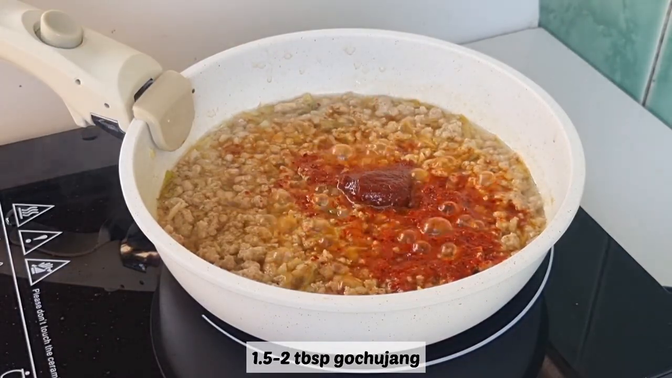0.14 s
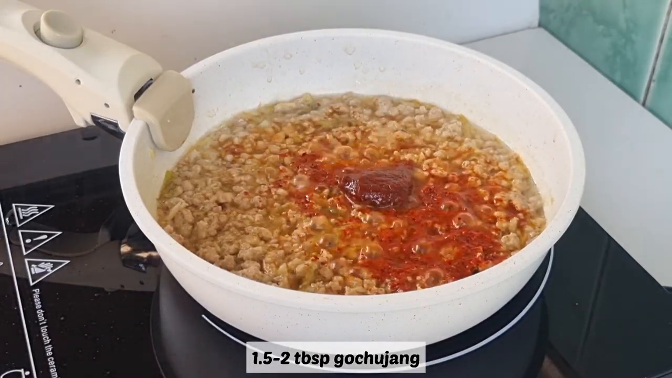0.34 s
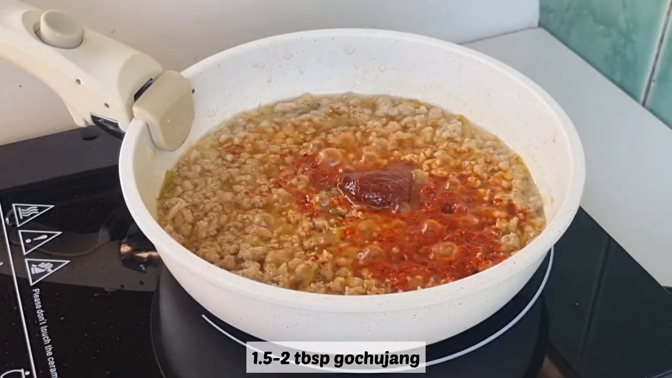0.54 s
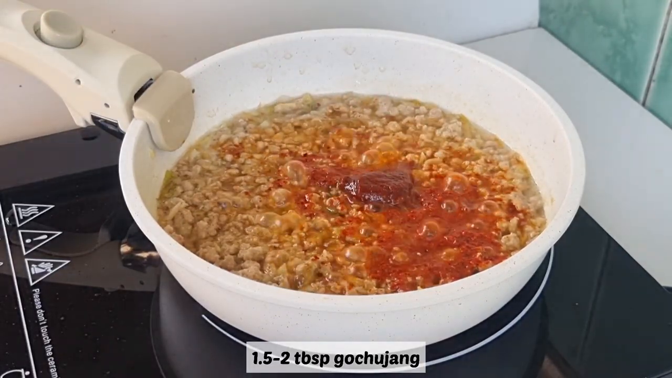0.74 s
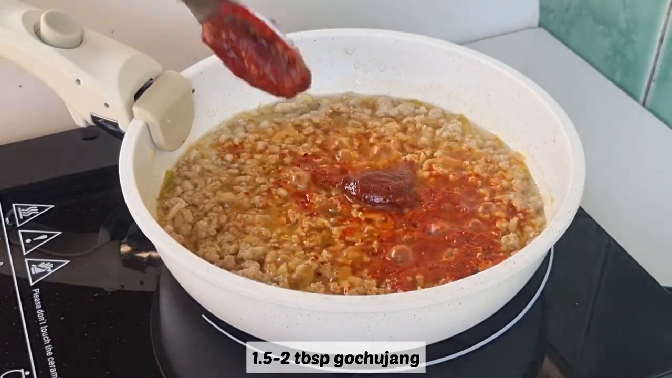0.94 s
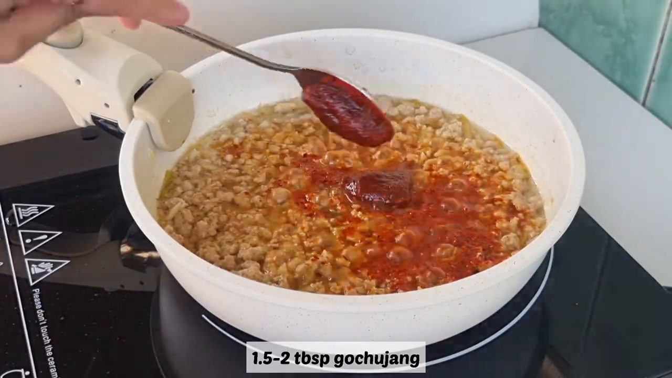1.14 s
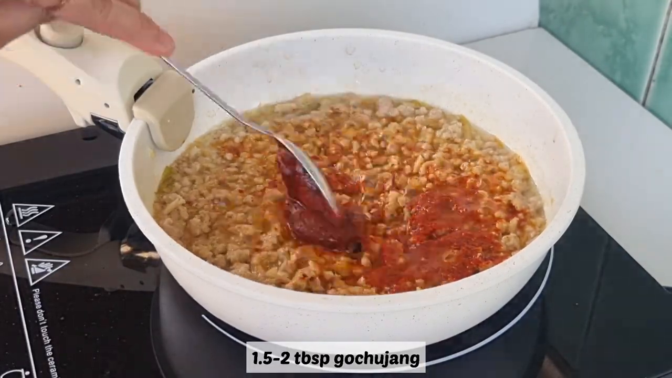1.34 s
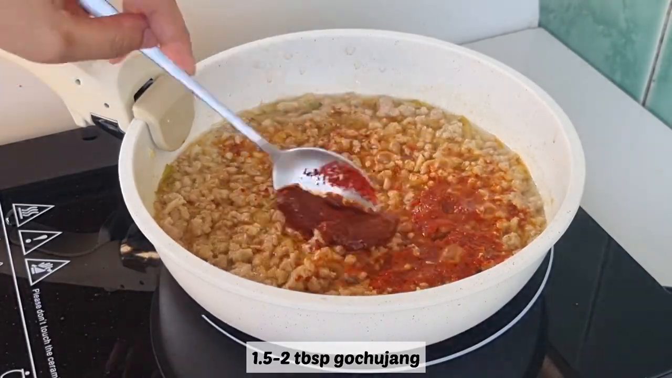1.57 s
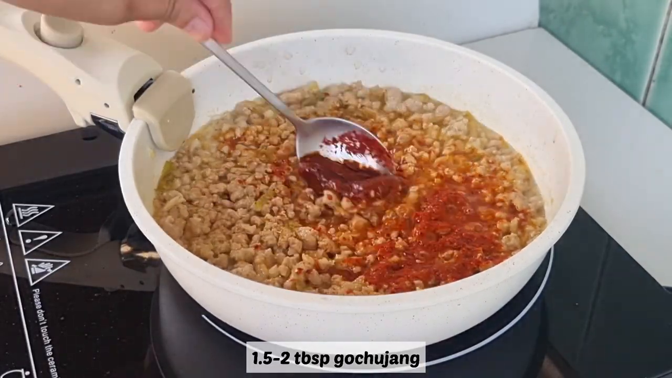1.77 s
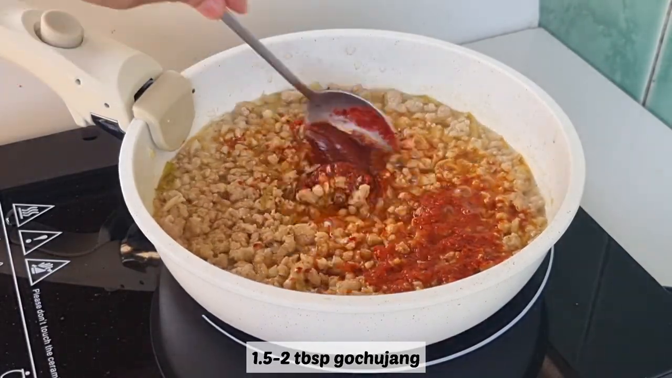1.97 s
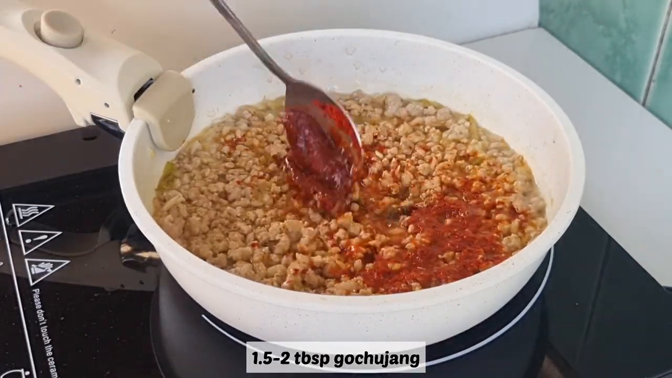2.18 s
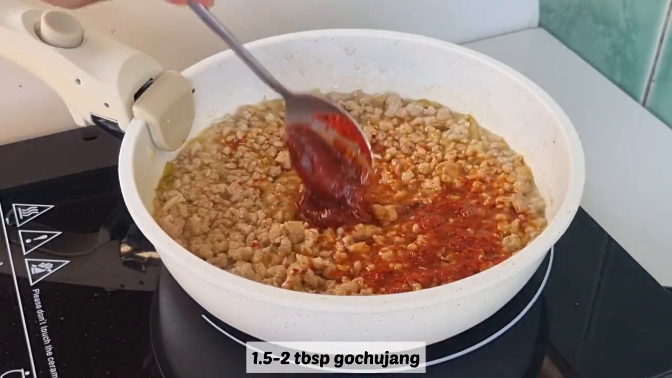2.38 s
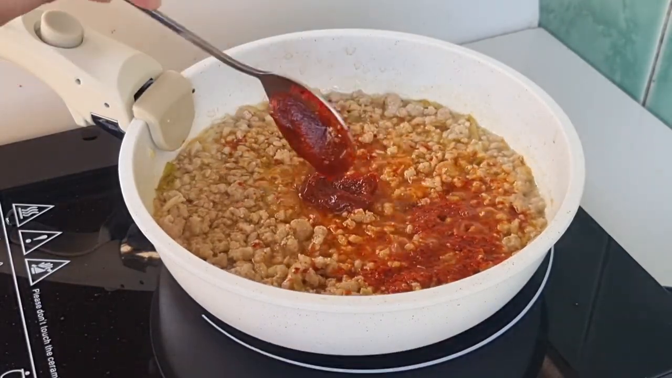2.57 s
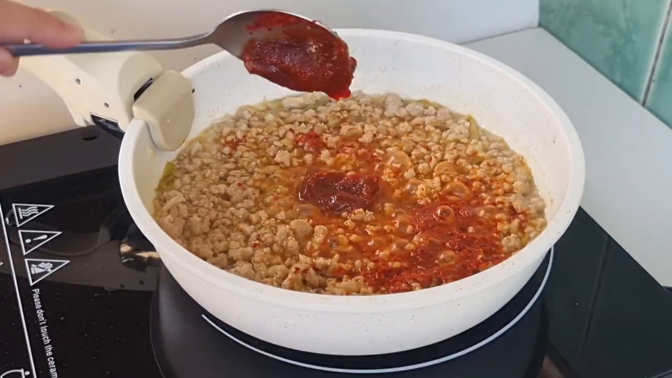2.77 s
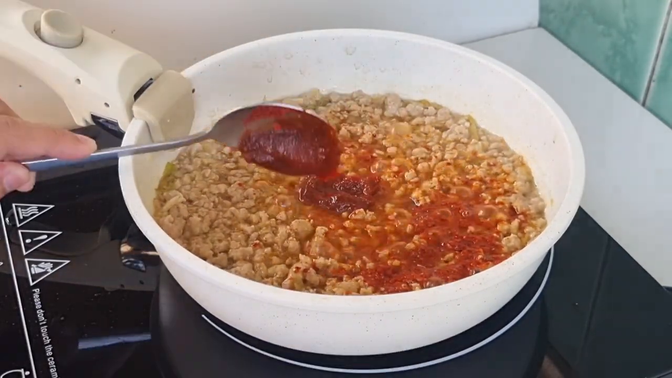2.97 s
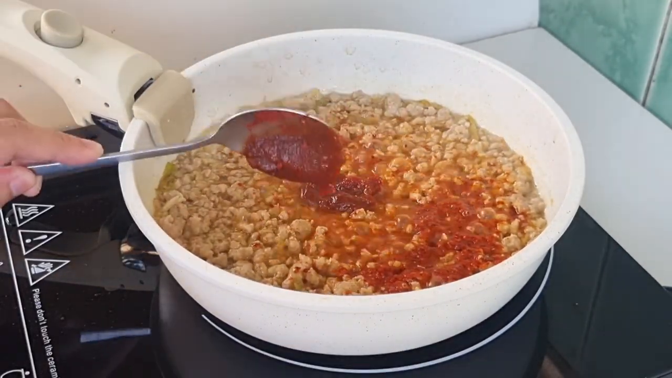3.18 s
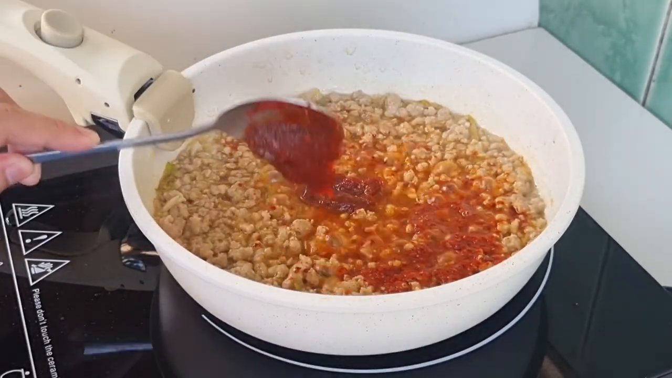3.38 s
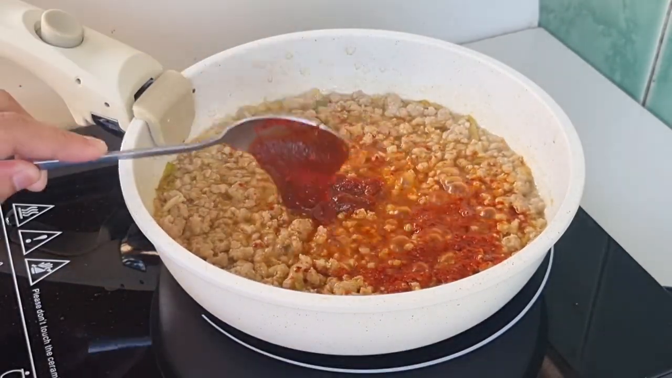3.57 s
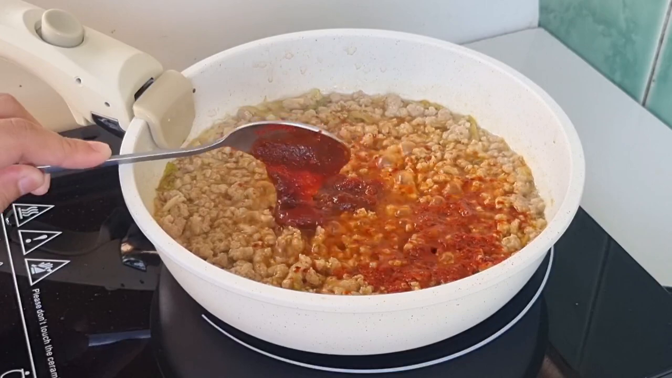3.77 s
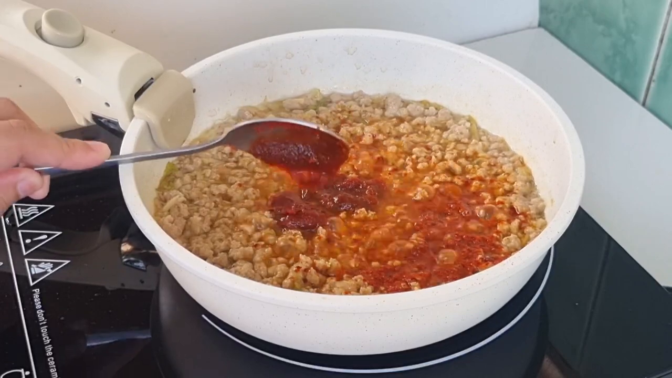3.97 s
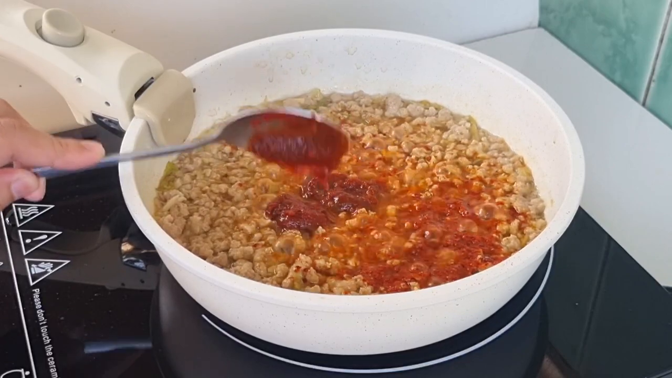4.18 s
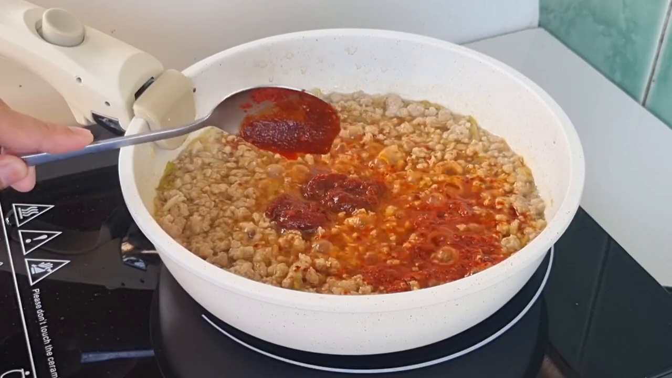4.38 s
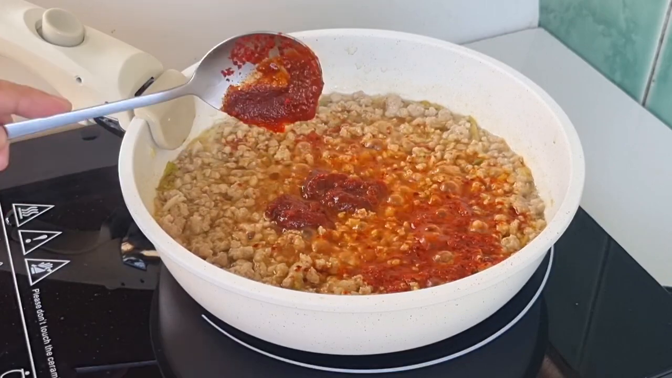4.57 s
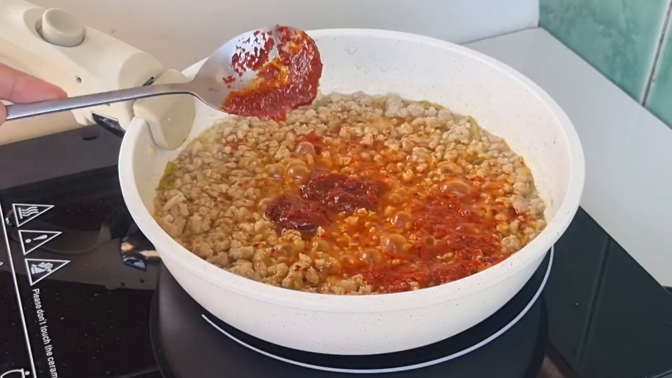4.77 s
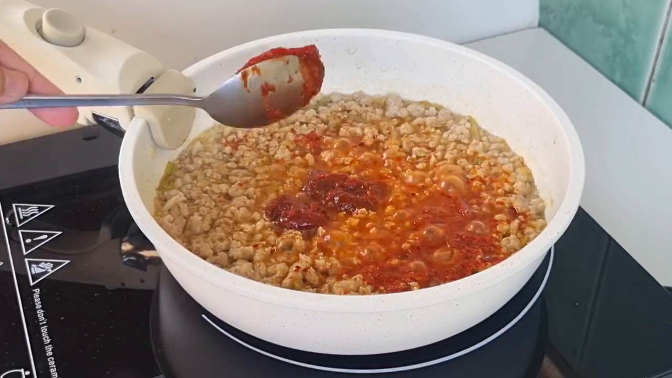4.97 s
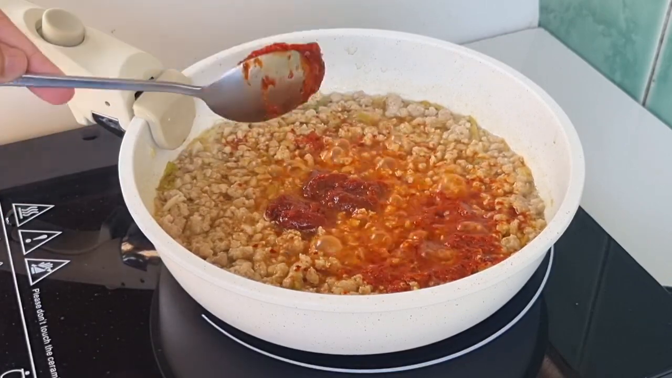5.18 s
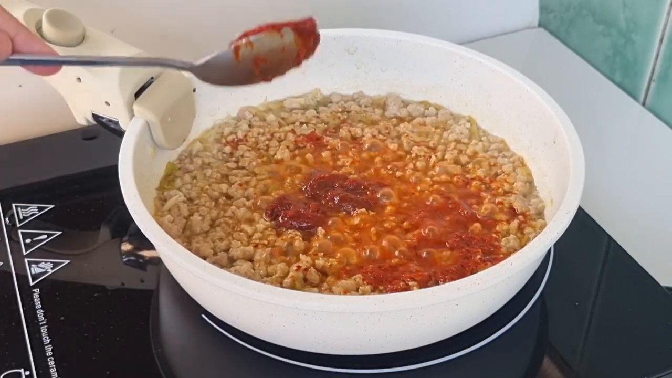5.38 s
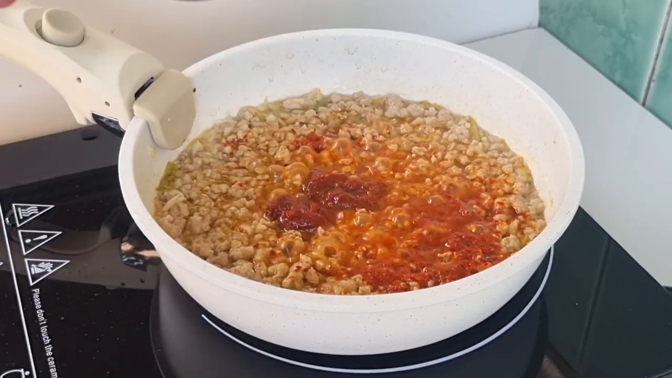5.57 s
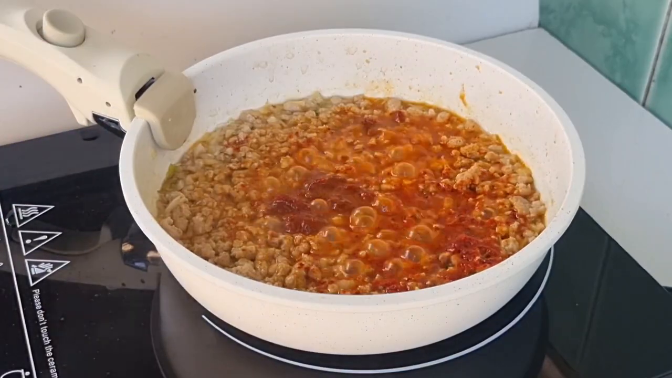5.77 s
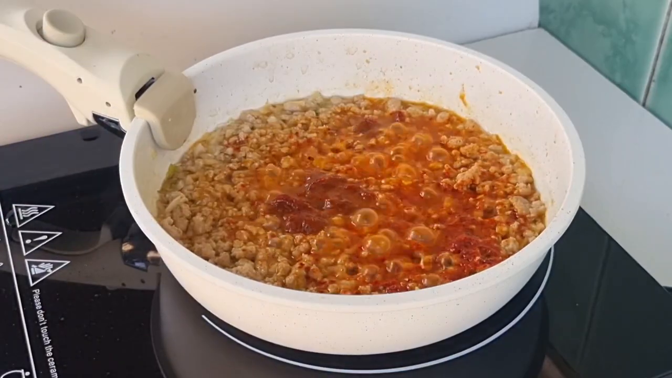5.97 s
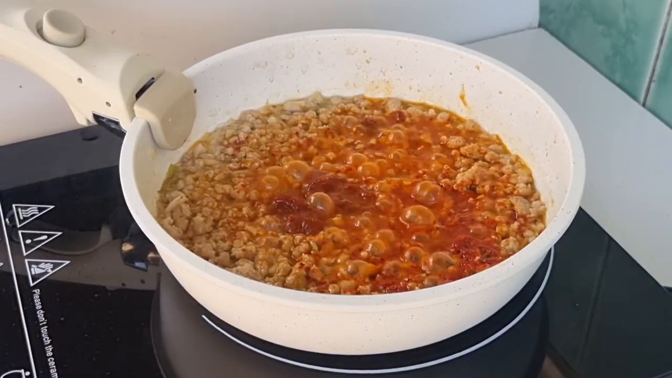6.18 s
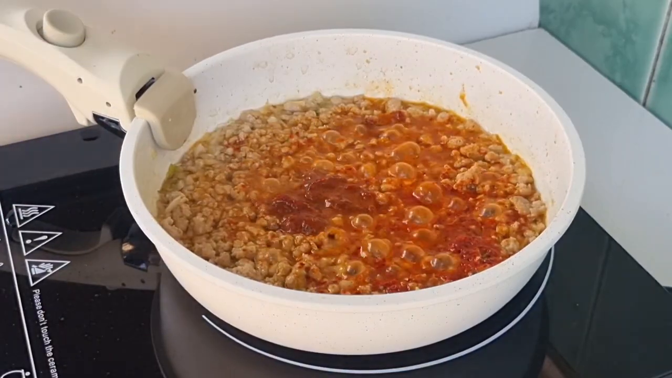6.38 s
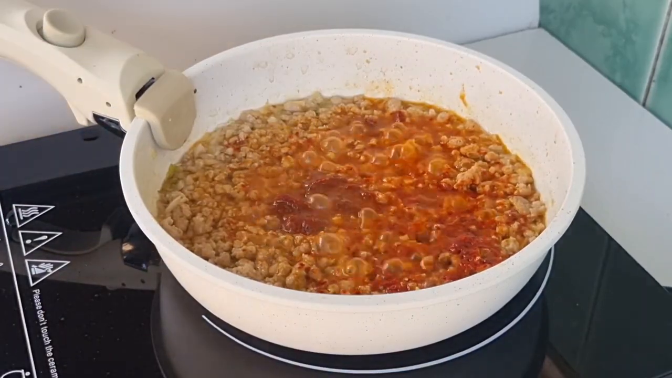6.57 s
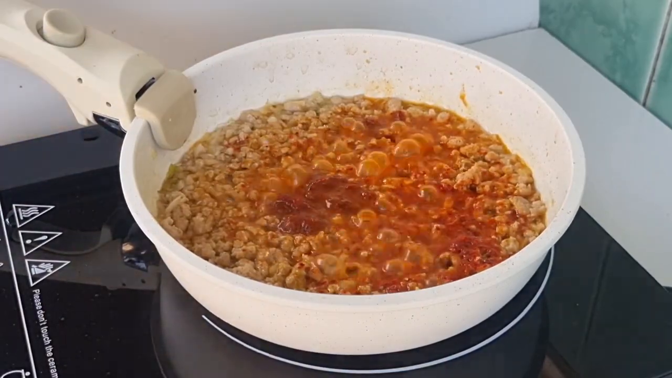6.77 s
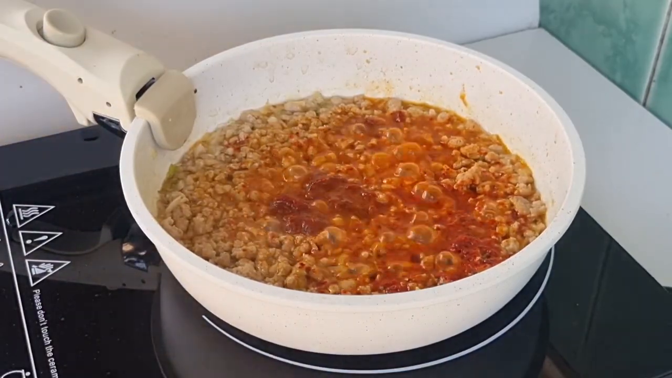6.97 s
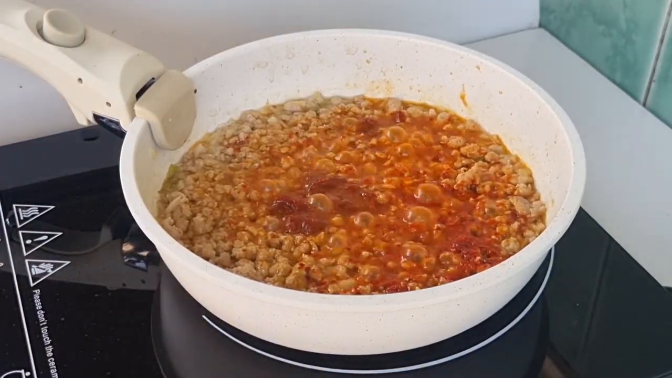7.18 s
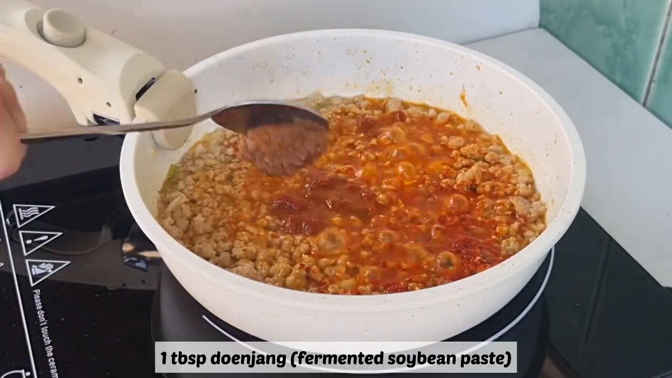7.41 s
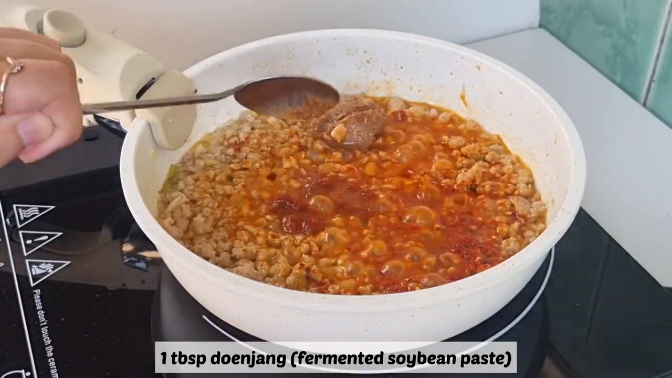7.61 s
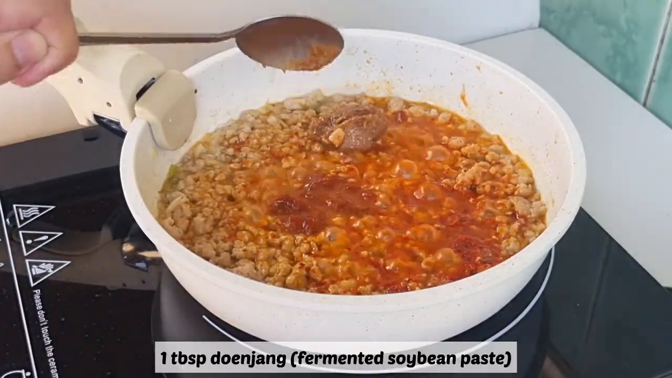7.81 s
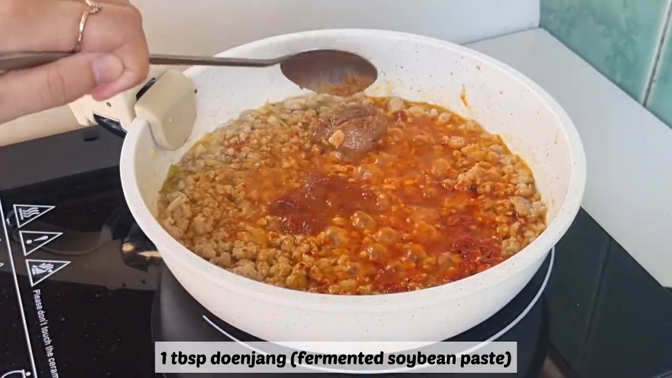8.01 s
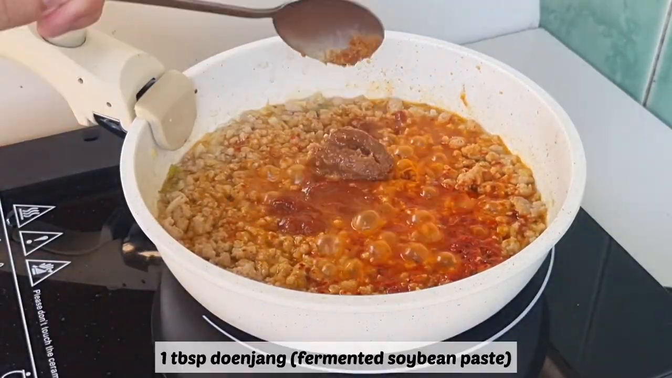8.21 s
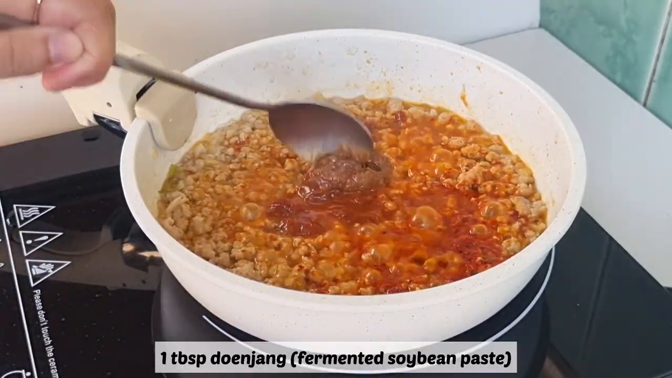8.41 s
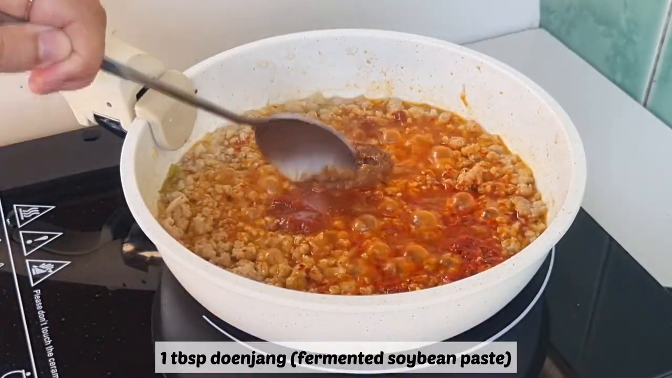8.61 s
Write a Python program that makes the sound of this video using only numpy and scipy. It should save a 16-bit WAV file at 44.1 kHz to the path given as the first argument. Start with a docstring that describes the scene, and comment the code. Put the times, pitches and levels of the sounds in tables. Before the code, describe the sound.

Minced meat simmers and bubbles in a pan over a low cooktop hum, a metal spoon clattering on the rim, then the boil grows harder.

```python
"""Minced pork simmers in a pan, as a close phone in a small kitchen hears it; the cooktop fan hums underneath.
Hissing, bursting films are coloured by the hollow of the pan, with ringing bubbles mixed in; a spoon scrapes
in short gritty strokes, knocks the rim eight times to shake off thick paste (clatter through shared
resonances), and bumps the pan dully. Later the sauce boils harder, and single pops and rings stand out.
Low filtered noise and soft thumps come and go on the two microphone ports."""
import sys
import numpy as np
from scipy import signal
from scipy.fft import rfft, irfft
from scipy.io import wavfile
from scipy.ndimage import uniform_filter1d

SR = 44100
rng = np.random.default_rng(int(sys.argv[2]) if len(sys.argv) > 2 else 0)


def file_out(sig):
    """Save sig as 16-bit WAV at sys.argv[1]."""
    # one column per channel
    cols = np.atleast_2d(sig).T
    # limit, then scale
    lim = np.clip(cols, -1, 1)
    pcm = np.round(lim * 32767).astype(np.int16)
    wavfile.write(sys.argv[1], SR, pcm)


N = 381465
TIME = np.arange(N) / SR

# the simmer is gentle, sinks a little while the cold paste goes in, then boils up
SIMMER_DB = -54
LULL_S, LULL_FALL_S, LULL_DB = 1.9, 2, -1.6
BOIL_S, BOIL_RISE_S, BOIL_DB = 5.6, 0.16, -51
BLIP_S = 0.033  # how long the largest bubbles ring
CONTACT_S = 0.0024  # time for the force of a blow to build up
SPOON_T60_S, PAN_T60_S = 0.017, 0.032  # decay of the contact force that drives light spoon and heavy pan
GUST_ATTACK_S, GUST_RELEASE_S = 0.023, 0.091
STILL_AIR_DB, STILL_AIR_PAN_DB = -58.5, -8.5  # flutter between the draughts; left minus right
ROOM_T60_S, ROOM_DB = 0.17, -8.5
TOP_HZ = 15850


def undb(db):
    """Decibels to gain."""
    return 10 ** (np.asarray(db) / 20)


def unit(x):
    """Scale to rms 1."""
    return x / np.sqrt(np.mean(x ** 2))


def unit_energy(x):
    """Scale a short stereo sound so that its left channel has energy 1."""
    return x / np.sqrt(np.sum(x[0] ** 2))


def add(out, s, x):
    """Mix a sound in at time s."""
    i = int(s * SR)
    out[:, i:i + x.shape[1]] += x[:, :N - i]


def fade(t, t60):
    """Exponential decay by 60 dB in t60."""
    return np.exp(-np.log(1000) * t / t60)


def ramp(start, length):
    """Straight rise from 0 to 1."""
    return np.clip((TIME - start) / length, 0, 1)


def pan(db):
    """Gains of the two channels for a left minus right level."""
    return undb(np.outer([.5, -.5], db))


def band(x, lo_hz, hi_hz, order=2):
    """Causal band-pass."""
    edges_hz = [lo_hz, min(hi_hz, SR / 2 - 1000)]
    return signal.sosfilt(signal.butter(order, edges_hz, "band", fs=SR, output="sos"), x)


def colour(x, points, peaks=(), size=8192):
    """Causal filter from (Hz, dB) points, with resonances (Hz, width Hz, dB) on top."""
    f = np.arange(size // 2 + 1) * SR / size
    hz, db = np.transpose(points)
    curve_db = np.interp(np.log(f + 1), np.log(hz), db)
    curve_db = curve_db + sum(g / (1 + (2 * (f - c) / w) ** 2) for c, w, g in peaks)
    # folding the cepstrum forward in time gives minimum phase
    cepstrum = irfft(curve_db * np.log(10) / 20)
    cepstrum[1:size // 2] *= 2
    cepstrum[size // 2 + 1:] = 0
    response = irfft(np.exp(rfft(cepstrum)))
    return signal.fftconvolve(x, response[None], axes=1)[:, :x.shape[1]]


def ports(x, alike, corner_hz):
    """Two unrelated signals as two close ports hear them: long waves reach both alike."""
    f = np.arange(N // 2 + 1) * SR / N
    shared = np.clip(alike, 0, 1) / (1 + (f / corner_hz) ** 2)
    mid, side = rfft(x) * np.sqrt([1 + shared, 1 - shared])
    return irfft(np.array([mid + side, mid - side]), N)


def walk(rate):
    """Smooth random wander with a spread near 1; rate is in new values per second."""
    hold = int(SR / rate)
    steps = np.repeat(rng.standard_normal(N // hold + 2), hold)
    return unit(uniform_filter1d(steps, hold)[:N])


def bursts(rate, spread_db, count=60000):
    """Tiny clicks of very unequal size; each reaches the two ports with its own lag and strength."""
    out = np.zeros((2, N))
    when, alive, lag = rng.random((count, 3)).T
    size = undb(spread_db * np.minimum(rng.exponential(size=count), 6))
    size = size * (alive < rate * N / SR / count)
    for channel, delay in enumerate((0, 24 * (lag - .5))):  # delay in samples
        places = (when * N + delay).astype(int) % N
        np.add.at(out[channel], places, size * rng.standard_normal(count))
    return unit(out)


def ring(hz, cycles):
    """An open bubble rings for a few cycles and rises in pitch from hz."""
    age = np.arange(int(cycles / hz * SR)) * hz / cycles / SR  # 0 to 1 over its life
    return np.sin(2 * np.pi * cycles * age * (1 + 0.14 * age)) * fade(age, 0.92)


def bubbles(rate, low_hz, high_hz, cycles, spread_db, count=3000):
    """Small bubbles that ring for a few cycles and rise in pitch as they open."""
    out = np.zeros((2, N))
    for when, alive, pitch, size, side in rng.random((count, 5)):
        if alive < rate * N / SR / count:
            hz = low_hz * (high_hz / low_hz) ** pitch
            strength = undb(-spread_db * np.log(size + 0.0082))
            add(out, when * N / SR, pan(10 * (side - .5)) * ring(hz, cycles) * strength)
    return unit(out)


def spit(hz, t60, spread, size=2048):
    """A bubble's film tears: a brief burst of noise around one pitch."""
    t, f = np.arange(size) / SR, np.arange(size // 2 + 1) * SR / size
    hump = np.exp(-(np.log((f + 1) / hz) / spread) ** 2)
    tear = irfft(rfft(rng.standard_normal((2, size))) * hump)
    return unit(tear) * np.minimum(t / 0.0009, 1) * fade(t, t60)


def crackle(rate, spread_db, count=1800):
    """Spits of every pitch all over the pan, most of them small and the high ones fainter."""
    out = np.zeros((2, N))
    for when, alive, pitch, size, length, side in rng.random((count, 6)):
        if alive < rate * N / SR / count:
            strength = undb(-spread_db * np.log(size + .1) - 4 * pitch)
            tear = spit(1900 * 7.6 ** pitch, 0.019 + 0.12 * length, spread=0.18)
            add(out, when * N / SR, strength * pan(8 * (side - .5)) * tear)
    return unit(out)


def strike(t, t60):
    """Force of one contact: it builds up quickly and dies away."""
    t = np.maximum(t, 0)
    return np.minimum(t / CONTACT_S, 1) ** 2.7 * fade(t, t60)


def chatter(contact, t, t60):
    """Clatter of two hard things in contact: it excites all pitches about evenly and is soon over."""
    spectrum = rfft(rng.standard_normal((2, len(t))) * contact)
    even = irfft(spectrum / np.abs(spectrum), len(t))  # keep the phases, level the spectrum
    return unit_energy(even * np.minimum(t / 0.003, 1) * fade(t, t60))


def same_bass(x, corner_hz):
    """The long waves of a blow reach both ports alike."""
    return band(x[0], 24, corner_hz, order=3) + band(x, corner_hz, 13700, order=3)


def fan():
    """The cooktop hums and its fan pushes air through the vents; the tones waver slightly."""
    # Hum of the cooktop. Each row: pitch in Hz, rms level in dB about which it wavers, before panning.
    hum_tones = [(120.3, -50), (425.3, -71.5), (586.8, -68), (850.6, -59.5), (1696, -89)]
    # Rush of air through the vents. Each row: frequency in Hz, relative density in dB per Hz.
    air_colour = [(25, -21.5), (70, 6.5), (130, 3), (200, -2), (370, -1), (460, -7.5), (580, 2.5),
                  (680, -7), (830, 0), (1100, -6), (1500, -20), (1750, -11), (3000, -22.5), (12000, -27)]
    air = ports(rng.standard_normal((2, N)), alike=0.96, corner_hz=1170)
    air = unit(colour(air, air_colour))
    tones = 0
    for hz, db in hum_tones:
        level = undb(db + 1.0 * walk(3.67))
        phase = 2 * np.pi * np.cumsum(hz + 1.18 * walk(6)) / SR
        tones = tones + level * np.sqrt(2) * np.sin(phase)
    return undb(-49) * air * pan(-2.5) + tones * pan(-3.5)


def draught():
    """Strength of the moving air at each port: every gust swells, holds and dies away."""
    # Draughts across the ports. Each row: start in seconds, length in seconds, level in dB,
    # left minus right in dB.
    gusts = [(0.0, 0.57, -53.5, 11), (1.554, 0.39, -50, 5), (1.996, 0.44, -47.5, 15),
             (5.05, 0.35, -43, -4.5), (5.69, 0.56, -42.5, 4), (6.355, 0.59, -45, -8.5),
             (6.97, 0.48, -44, 9), (7.422, 0.42, -47.5, -3), (8.08, 0.45, -49.5, 10)]
    power = (undb(STILL_AIR_DB) * pan(STILL_AIR_PAN_DB)) ** 2
    for s, length, db, side_db in gusts:
        swell = ramp(s, GUST_ATTACK_S) * (1 - ramp(s + length, GUST_RELEASE_S))
        power = power + (undb(db) * pan(side_db) * swell) ** 2
    return np.sqrt(power)


def rumble():
    """Moving air and handling make a low flutter on each port, with soft thumps about two cycles long."""
    # Tone of the flutter. Each row: frequency in Hz, relative density in dB per Hz.
    flutter_colour = [(20, -26), (40, -3.5), (70, 2), (100, -4), (150, -10.5), (250, -27), (500, -43),
                      (1000, -60)]
    # The strongest low thumps. Each row: crest in seconds, level in dB, pitch in Hz, left minus right in dB,
    # rustle relative to the thump in dB.
    low_thumps = [(2.178, -40, 197, 15, -4), (2.226, -37, 80, 10, -17), (2.247, -33, 106, 18, -22),
                  (2.298, -45, 150, 15, -3), (2.37, -40, 90, 12, -20), (2.389, -41, 115, 12, -20),
                  (5.121, -39, 83, -7, -23), (5.2, -41, 74.6, -11, -23), (5.314, -37.5, 65, -13, -23),
                  (5.722, -38, 346, 17, -3), (5.75, -37, 79.5, -8, -20), (5.795, -35, 70, -15, -23),
                  (5.904, -32, 70, -3, -15.5), (6.066, -37, 200, -3, -3), (6.08, -31, 195, 0, -5),
                  (6.095, -31, 70, -9, -18), (6.139, -27, 86, 2, -20), (6.185, -42, 85, -1, -24),
                  (6.243, -37, 105, -2, -22), (6.412, -24.5, 74, -6, -28), (7.155, -33, 62.6, -5, -25),
                  (7.37, -35.5, 60, 13.5, -19), (7.371, -38.5, 240, 10, -3), (8.469, -36, 139, 15, -12)]
    flutter = ports(rng.standard_normal((2, N)), alike=0.19, corner_hz=300)
    flutter = unit(colour(flutter, flutter_colour))
    out = draught() * flutter * undb(0.93 * walk(22))
    t = np.arange(-SR // 20, SR // 20) / SR
    for s, db, hz, side_db, rustle_db in low_thumps:
        rustle = unit(band(rng.standard_normal((2, len(t))), 160, 354, order=3))
        tone = np.sin(2 * np.pi * (hz * t + rng.random()))
        swell = np.exp(-(t * hz / 0.83) ** 2)
        push = swell * (tone + undb(rustle_db) * rustle)
        add(out, max(s + t[0], 0), undb(db) * pan(side_db) * push)
    return out


def heat():
    """Level of the simmer in dB: gentle, a lull, then a harder boil."""
    gentle_db = SIMMER_DB + LULL_DB * ramp(LULL_S, LULL_FALL_S)
    return gentle_db + (BOIL_DB - gentle_db) * ramp(BOIL_S, BOIL_RISE_S)


def simmer():
    """Bursting films and ringing bubbles sound together; a harder boil gurgles and spits more."""
    # Tone of the simmer's noise, with some low fan sound in it. Each row: frequency in Hz,
    # relative density in dB per Hz.
    simmer_colour = [(180, -27), (300, -11.5), (372, -1.5), (454, -13.5), (563, -7), (798, -1.5),
                     (1500, -10), (1770, -11.5), (2050, -9.5), (3610, -11.5), (4710, -18.5), (7130, -12.5),
                     (9450, -27), (13400, -20), (15800, -21.5)]
    # Hollow of the pan above the sauce. Each row: frequency in Hz, width in Hz, lift in dB.
    hollow = [(568, 59, 4.5), (811, 77, 3.5), (1025, 64, 4), (1255, 170, 5), (1750, 180, 8),
              (3020, 730, 3.5), (4320, 1170, 5), (8140, 600, 3)]
    level_db = heat()
    vigour_db = level_db - level_db.mean()
    films = bursts(rate=4200, spread_db=1.2)
    steam = rng.standard_normal((2, N))
    boil = ports(films + undb(-1.0) * steam, alike=0.34, corner_hz=1510)
    boil = colour(boil, simmer_colour, hollow)
    # level set by the band from 2 to 5 kHz
    boil = boil * undb(.6 * walk(25)) / band(boil, 2000, 5000).std()
    blips = bubbles(rate=150, low_hz=596, high_hz=4150, cycles=27, spread_db=5.0)
    gurgle = bubbles(rate=45, low_hz=558, high_hz=1440, cycles=19.5, spread_db=2.5)
    gurgle = gurgle * undb(1.1 * vigour_db)
    spits = crackle(rate=130, spread_db=6.5) * undb(0.34 * vigour_db)
    mix = undb(1.5) * boil + undb(-7.0) * blips + undb(-9) * gurgle + undb(-5) * spits
    return undb(level_db) * mix


def pops():
    """The larger bubbles snap open or ring one by one."""
    # Largest bubbles that burst and spit. Each row: start in seconds, level in dB before a common 0.5 dB lift,
    # centre in Hz, 60 dB decay in seconds.
    snaps = [(.0927, -48, 3000, .015), (0.2897, -37, 2260, 0.032), (1.288, -40, 3230, 0.017),
             (1.529, -36.5, 3600, 0.028), (2.398, -41, 3000, .015), (4.625, -37.5, 10000, 0.034),
             (4.856, -40, 7300, 0.028), (4.867, -38, 3330, 0.029), (5.638, -33, 6800, 0.0099),
             (5.681, -38, 3000, 0.013), (5.773, -42, 8000, 0.023), (5.846, -45, 9500, .03),
             (5.955, -35, 4500, 0.0087), (5.995, -38, 940, 0.055), (6.148, -43, 12000, .008),
             (6.158, -38, 12000, .015), (6.407, -44, 2800, .014), (6.4875, -35, 3500, .016),
             (6.672, -27, 8900, 0.01), (6.8966, -40, 3300, 0.013), (6.990, -34, 9000, 0.0088),
             (7.283, -35.5, 3500, 0.014), (7.623, -40, 5500, 0.015), (7.665, -34.5, 4280, 0.014),
             (7.785, -36, 6000, 0.014), (7.752, -36, 13000, 0.017), (8.107, -33, 5800, 0.009),
             (8.387, -44, 13000, .02), (8.405, -39, 13000, .03)]
    # Largest bubbles with a round pitch. Each row: start in seconds, peak level in dB, starting pitch in Hz.
    round_bubbles = [(0.289, -45, 1480), (0.289, -42, 2150), (1.226, -47, 2720), (1.53, -41, 3870),
                     (5.638, -50, 1400), (5.953, -38, 1360), (6.268, -37, 1400), (6.609, -42, 625),
                     (6.858, -41, 3540), (6.898, -39, 3510), (7.146, -43, 3510), (7.282, -42, 3640),
                     (7.477, -40, 3510), (8.21, -38, 1360)]
    out = np.zeros((2, N))
    for s, db, hz, t60 in snaps:
        add(out, s, undb(db + 0.5) * spit(hz, t60, spread=0.59))
    for s, db, hz in round_bubbles:
        add(out, s, pan(0) * undb(db) * ring(hz, cycles=hz * BLIP_S))
    return out


def scrapes():
    """The spoon sticks and slips over the bottom of the pan in short gritty strokes."""
    # Spoon dragged through the meat. Each row: start in seconds, length in seconds, level in dB at mid-stroke,
    # centre in Hz.
    strokes = [(1.424, 0.066, -51, 12500), (1.52, 0.059, -64, 3400), (1.666, .06, -49.5, 3800),
               (1.935, 0.054, -47, 3600)]
    out, grit = np.zeros((2, N)), bursts(rate=1800, spread_db=-2)
    for s, length, db, hz in strokes:
        stroke = np.sin(np.pi * ramp(s, length))
        out += undb(db) * stroke * unit(band(grit, 0.64 * hz, 1.3 * hz))
    return out


def bumps():
    """A softer contact: a dull, hollow clack that rebounds; the first touch sets the pan's bottom ringing."""
    # Bump and its rebounds. Each row: start in seconds, level in dB before a common 12 dB cut,
    # favoured pitch in Hz, its lift in dB.
    touches = [(4.655, -29.5, 1660, 10), (4.6585, -27.5, 2800, 7), (4.6625, -29, 1700, 5),
               (4.6684, -34, 1700, 3), (4.682, -36, 1900, 8), (4.690, -38, 230, 14)]
    # Tone of the dull bump. Each row: frequency in Hz, relative density in dB per Hz.
    dull_colour = [(60, -12), (250, -7), (400, -7), (850, -9.5), (1200, -18), (1750, -8.5), (3000, -8.5),
                   (4300, -13), (6000, -15.5), (9000, -32), (15000, -37)]
    # Resonances of the bumped pan. Each row: frequency in Hz, width in Hz, lift in dB.
    pan_modes = [(546, 130, 7), (1390, 120, 9), (1673, 130, 10), (1950, 220, 4), (2300, 130, 3),
                 (2720, 150, 9), (3560, 140, 7), (5900, 220, 7)]
    out, t = np.zeros((2, N)), np.arange(SR // 10) / SR
    for s, db, hz, lift_db in touches:
        clack = same_bass(chatter(fade(t, 0.015), t, t60=0.084), corner_hz=900)
        blow = colour(clack, dull_colour, list(pan_modes) + [(hz, 200, lift_db)])
        add(out, s, undb(db - 12) * unit(blow))
    bottom = np.sin(2 * np.pi * pan_modes[0][0] * t) * strike(t, t60=0.043)
    add(out, touches[0][0], undb(-27.5) * pan(0) * bottom)
    return out


def taps():
    """The spoon hits the rim, rebounds and shivers; blows share resonances and favour a low and a high one."""
    # Knocks on the rim. Each row: start in seconds, body, mid, ring and top balance in dB,
    # favoured body pitch in Hz, its lift in dB, favoured ring pitch in Hz, its lift in dB,
    # rebound delay in seconds, rebound strength from 0 to 1, ring length as a factor.
    knocks = [(3.0009, -1.5, 0, -2, -12.5, 1290, 7, 6200, 7, 0.0022, 0.3, 0.33),
              (3.105, -0.5, -1.5, 5, -6.5, 1340, 4, 8570, 0, 0.001, 0.6, 0.36),
              (3.2139, 1.5, 1, 5, -3, 1520, 10, 6180, 7.5, 0.0025, 0.35, 0.39),
              (3.358, 0, -1.5, 7, -1.5, 1410, 3, 7650, 0, 0.0043, 0.4, 0.77),
              (3.5306, 0.5, 0.5, 6, 0, 920, 2, 6310, 0.5, 0.0014, 0.35, 0.76),
              (3.7821, -1, 1.5, 2.5, -2.5, 950, 5, 7640, 10, 0.0034, 0.2, 0.87),
              (4.0396, 0.5, 1.5, 3.5, -3.5, 990, 3.5, 7530, 9.5, 0.0039, 0.37, 0.75),
              (4.2517, 2, 2, 5, -1.5, 1210, 1, 6540, 5, 0.0026, 0.4, 0.49)]
    # Spoon and pan together. Each row: frequency in Hz, width in Hz, lift in dB, left minus right in dB.
    spoon_modes = [(390, 135, 8.5, 0), (586, 104, 11.5, -10), (655, 73, 11.5, 15), (820, 83, 8, 3),
                   (972, 155, 15.5, -4.0), (1160, 126, 6.5, -0.5), (1330, 97, 6.5, 0), (1420, 97, 3.5, 0.5),
                   (1730, 270, 13, -1), (1985, 190, 3, -9), (2210, 140, 8, -5), (2624, 154, 14.5, 2.5),
                   (3083, 390, 16, -1.6), (3450, 131, 7, -9), (3800, 290, 7, -4.4), (6470, 470, 9.5, -4),
                   (6920, 250, 7.5, 7), (7930, 660, 8, -8), (8510, 440, 6.5, 10), (9200, 230, 5, -3.0),
                   (9530, 291, 11.5, 1), (11316, 610, 7.5, -1), (12400, 314, 3.5, -9), (14400, 409, 7, 3),
                   (15700, 402, 0, -1)]
    # Chatter of the contact. Each row: frequency in Hz, relative density in dB per Hz.
    contact_colour = [(150, 5), (500, -7), (750, -11), (1100, -2.0), (2400, -1.1), (4400, -8.5), (5800, -2),
                      (9000, -2), (10200, -5), (12000, 2.5), (13000, 0), (15800, 7)]
    out, t = np.zeros((2, N)), np.arange(SR // 5) / SR
    for (s, body_db, mid_db, ring_db, top_db, body_hz, body_lift_db, ring_hz, ring_lift_db,
         rebound_s, rebound, length) in knocks:
        contact = np.hypot(strike(t, SPOON_T60_S), rebound * strike(t - rebound_s, SPOON_T60_S))
        spoon = band(chatter(contact, t, t60=0.032), 2570, 18000)

        body = chatter(strike(t - .0005, PAN_T60_S), t, t60=0.087)  # the pan answers a moment later
        body = band(same_bass(body, corner_hz=730), 137, 2050)

        shiver = rng.standard_normal((2, len(t))) * strike(t, 0.19 * length)
        shiver = band(unit_energy(shiver), 1400, 20000, order=1)

        blow = undb(3.2) * spoon + undb(0.85) * body + undb(-4.0) * length * shiver
        blow = blow + 0.074 * blow[::-1]  # the two ports share a part of the blow
        heard = []
        for port, side in zip(blow, (.5, -.5)):
            modes = [(hz, width, db + side * side_db) for hz, width, db, side_db in spoon_modes]
            heard.append(colour(port[None], contact_colour, modes))
        balance = [(900, body_db), (3000, mid_db), (7500, ring_db), (14000, top_db)]
        favoured = [(body_hz, 350, body_lift_db), (ring_hz, 700, ring_lift_db)]
        add(out, s, colour(np.vstack(heard), balance, favoured))
    return out


def kitchen(x):
    """Tiles and worktop return a short dense tail, and the nearest walls a scattered echo each."""
    # Nearest walls. Each row: delay in seconds, spread in seconds, level in dB.
    wall_echoes = [(0.0068, 0.00087, -19.5), (0.02, 0.0063, -25)]
    t = np.arange(SR // 2) / SR
    tail = rng.standard_normal((2, len(t))) * fade(t, ROOM_T60_S) * np.clip((t - .003) / 0.0021, 0, 1)
    tail_colour = [(200, 3.5), (1000, 3.0), (3000, -3.0), (8000, -8.0), (15000, -7.0)]  # (Hz, dB)
    response = undb(ROOM_DB) * colour(unit_energy(tail), tail_colour)
    for s, spread_s, db in wall_echoes:
        wall = rng.standard_normal((2, len(t))) * np.exp(-((t - s) / spread_s) ** 2)
        response = response + undb(db) * unit_energy(wall)
    return x + signal.fftconvolve(x, response, axes=1)[:, :N]


def scene():
    """Pan and spoon in the kitchen, over the fan and the rumble."""
    cooking = simmer() * pan(-1.2) + pops() + scrapes() + bumps() + taps()
    return fan() + rumble() + kitchen(cooking)


def record(dry):
    """The phone rounds the sharpest peaks and cuts the top."""
    rounded = .8 * np.tanh(dry / .8)
    return signal.sosfilt(signal.ellip(10, .2, 70, TOP_HZ, fs=SR, output="sos"), rounded)


dry = scene()
out = record(dry)
file_out(out)
```